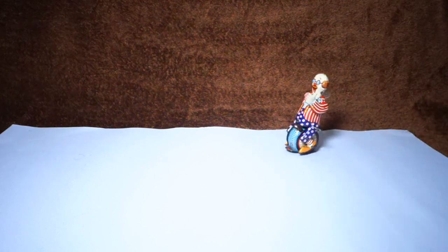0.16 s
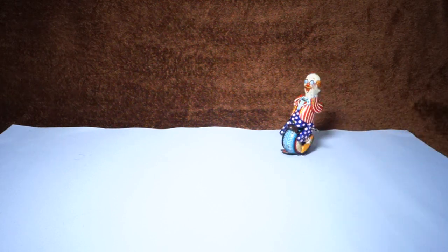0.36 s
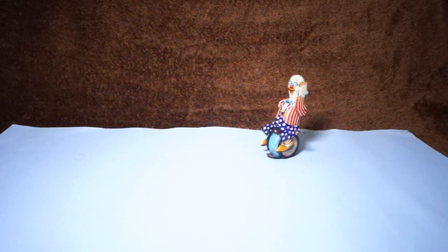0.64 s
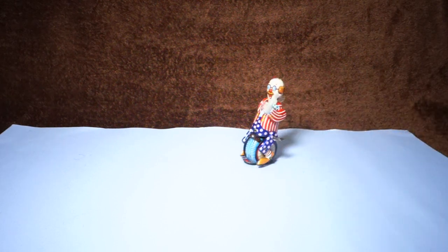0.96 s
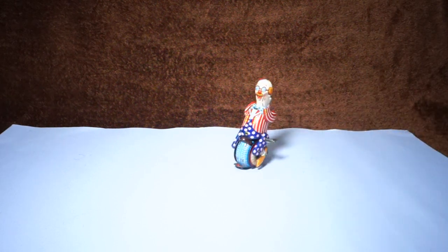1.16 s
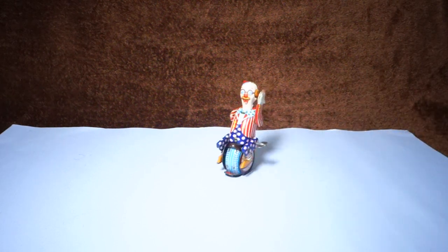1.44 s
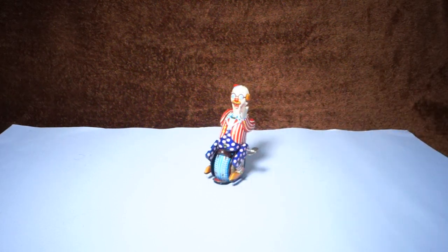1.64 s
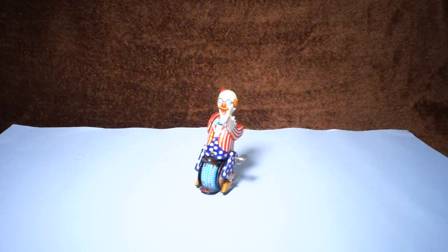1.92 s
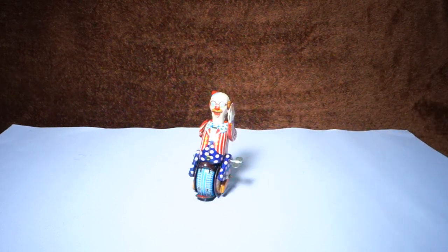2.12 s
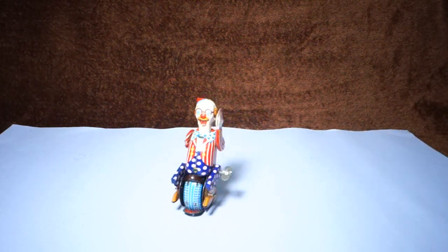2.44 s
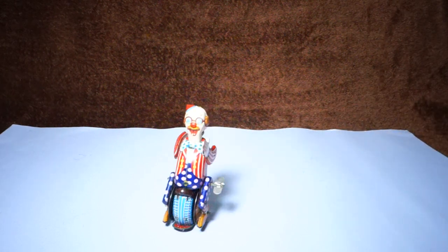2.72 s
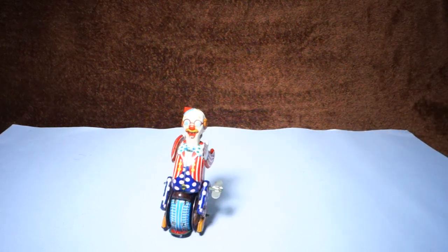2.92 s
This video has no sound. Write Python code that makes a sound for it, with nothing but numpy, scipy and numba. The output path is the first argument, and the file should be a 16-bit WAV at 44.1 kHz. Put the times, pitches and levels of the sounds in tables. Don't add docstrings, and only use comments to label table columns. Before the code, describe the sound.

Clockwork toy gears rattle through thin, bright tin: halting clicks, a fast buzzing ratchet, a dragging slowdown, two more fast runs and a stuttering end, with short room echo, faint hum and soft hiss.

```python
import sys
import numpy as np
from scipy import signal
from scipy.fft import rfft, irfft, next_fast_len
from scipy.io import wavfile
from scipy.ndimage import uniform_filter1d
from numba import njit

SR = 44100
rng = np.random.default_rng(int(sys.argv[2]) if len(sys.argv) > 2 else 0)


def to_wav(s):
    ch = np.atleast_2d(s).T
    pcm = np.round(np.clip(ch, -1, 1) * 32767)
    wavfile.write(sys.argv[1], SR, pcm.astype(np.int16))


def boost_factor(decibels):
    exponent = np.asarray(decibels, float) / 20
    return 10 ** exponent


N = 135828

# frequency in Hz, level in dB.
HUM = [(96, -64), (102, -65)]
# frequency in Hz, level in dB per Hz.
ROOM_TONE = [(25, -22), (60, -1.5), (200, -0.5), (400, -7), (1000, -13), (2000, -8.5), (9000, -18),
             (16000, -23)]
ROOM_DB = -54.5

ECHO_DB, ECHO_T60_S, ECHO_LIKENESS = -7.5, 0.074, 0.81

# start in seconds, peak in
# dB.
STALL_TEETH = [(0.0004, -29.5), (0.0071, -29.5), (0.0152, -38), (0.0297, -37), (0.0603, -47), (0.0773, -34.5),
               (0.0978, -34), (0.1197, -63), (0.1266, -29.0), (0.1504, -32), (0.1678, -29.5), (0.1829, -30),
               (0.2015, -33), (0.2152, -58), (0.2295, -32.5), (0.2416, -57), (0.2546, -29.5), (0.2655, -23),
               (0.2786, -30.5), (0.2897, -23.5),
               (1.709, -24), (1.721, -27.5), (1.7382, -27), (1.7513, -25), (1.7663, -26), (1.779, -27.5),
           (1.7963, -29), (1.8113, -44), (1.8253, -33.4), (1.831, -37), (1.8499, -30), (1.8638, -23.5),
           (1.8835, -27), (1.8954, -24.5), (1.911, -28), (1.9247, -26), (1.954, -32), (1.98, -28.5),
           (1.993, -27), (2.0112, -25.5), (2.0258, -25.5), (2.0364, -24.5), (2.0452, -23),
               (2.7245, -26.5), (2.7376, -49), (2.7465, -35), (2.7823, -56), (2.7941, -41.8), (2.8014, -43),
           (2.8307, -32), (2.8536, -29), (2.864, -40), (2.8772, -29.5), (2.8877, -25.5), (2.9018, -29),
           (2.9167, -27), (2.9321, -46), (2.9459, -42), (2.9587, -52), (2.971, -38), (2.9923, -29),
           (3.005, -23), (3.0224, -28), (3.0357, -24.5), (3.0496, -23.5), (3.058, -23.4), (3.0703, -23)]
# start in seconds, peak in dB.
DRAG_TEETH = [(0.7278, -31), (0.7406, -25.5), (0.7579, -26.7), (0.77, -22), (0.7814, -28), (0.7929, -24),
              (0.8063, -25), (0.8194, -25), (0.8318, -25.5), (0.8441, -28.5), (0.8577, -21.5), (0.8697, -26.5),
              (0.8861, -24), (0.8989, -28), (0.9164, -24), (0.928, -25), (0.9436, -26), (0.9622, -28.5),
              (0.9824, -25), (0.9951, -29.5), (1.0067, -34), (1.013, -31), (1.0277, -25), (1.0402, -30),
              (1.0526, -27.5), (1.0708, -27), (1.0849, -25),
              (1.5473, -27.5), (1.5678, -24.5), (1.5823, -24), (1.5987, -25), (1.6127, -24), (1.6271, -24.5),
          (1.6397, -22.5), (1.6551, -28), (1.667, -22), (1.6815, -23.5), (1.694, -24),
              (2.482, -25.1), (2.5006, -25.5), (2.514, -23), (2.5326, -25.5), (2.542, -24.2), (2.557, -25.5),
          (2.571, -23), (2.5874, -24.5), (2.6004, -23.5), (2.615, -26), (2.629, -24.5), (2.6443, -27.2),
          (2.659, -25), (2.6784, -25), (2.6904, -24), (2.7118, -23)]
# start in seconds, peak in dB.
RUN_TEETH = [(0.3003, -21.5), (0.3074, -22.6), (0.319, -24.5), (0.3277, -22.5), (0.3382, -26), (0.3481, -25),
             (0.359, -22.5), (0.3702, -27), (0.3793, -23), (0.3865, -27), (0.3991, -25), (0.4063, -22),
             (0.4194, -22.5), (0.4291, -25), (0.439, -23.5), (0.4473, -21), (0.4574, -24), (0.4638, -24),
             (0.4777, -29), (0.4852, -26), (0.4969, -28), (0.5054, -30), (0.5181, -24), (0.5277, -25.5),
             (0.5386, -28), (0.5477, -23.5), (0.5584, -24.4), (0.57, -25.5), (0.5807, -27), (0.5905, -23),
             (0.6014, -28), (0.6107, -27), (0.6209, -20), (0.6298, -30), (0.6416, -24.2), (0.6524, -23.5),
             (0.6624, -23.5), (0.6731, -25), (0.6835, -25), (0.6968, -25.9), (0.7102, -25.9),
             (1.0963, -24.5), (1.1081, -22.5), (1.118, -22), (1.128, -23), (1.1363, -24.5), (1.1469, -24.5),
         (1.1556, -23.5), (1.1686, -23.5), (1.178, -22), (1.19, -23), (1.1966, -25), (1.2074, -21),
         (1.2163, -27), (1.227, -25), (1.2352, -22), (1.2486, -24.5), (1.26, -27), (1.2693, -22.5),
         (1.2785, -22.5), (1.2883, -22.5), (1.2986, -33), (1.308, -24), (1.317, -28), (1.3299, -22),
         (1.343, -31), (1.353, -25), (1.364, -26), (1.376, -21), (1.3876, -29.5), (1.3977, -23.5),
         (1.409, -26), (1.419, -22.5), (1.4303, -23), (1.4405, -20.5), (1.4483, -26.5), (1.4586, -23.4),
         (1.4682, -21), (1.481, -18.5), (1.491, -29), (1.5007, -25), (1.5096, -21.5), (1.5224, -24),
         (1.534, -25.5),
             (2.057, -20.5), (2.0679, -20), (2.0831, -26), (2.094, -24.5), (2.1037, -22), (2.1137, -21),
         (2.1238, -22), (2.1316, -20.5), (2.145, -26.5), (2.1539, -21), (2.166, -25.5), (2.176, -20.5),
         (2.188, -22), (2.1964, -25), (2.21, -21), (2.2186, -23.9), (2.2324, -23), (2.2466, -25),
         (2.257, -21), (2.2666, -22), (2.279, -28), (2.2883, -24), (2.3023, -21.5), (2.3146, -36.5),
         (2.325, -21.5), (2.3377, -25), (2.349, -22), (2.3603, -23.5), (2.372, -24), (2.3808, -22),
         (2.3928, -21.3), (2.4037, -31), (2.411, -20.5), (2.424, -21), (2.434, -29), (2.445, -24),
         (2.4577, -22.5), (2.4702, -25.5)]
STALL_DB, DRAG_DB, RUN_DB = 2, -1.2, -0.84

# start in seconds, end in seconds.
RUNS_S = [
    (.285, .72),
    (1.092, 1.542),
    (2.03, 2.477),
]
# time in seconds, load in dB.
WHEEL_LOAD = [
    (.3, 0),
    (.52, 6.5),
    (.72, -1),
    (1.09, 4.5),
    (1.3, 7),
    (1.54, -1.5),
    (2.05, 3.5),
    (2.25, 4.5),
    (2.48, 5.5),
]
STALL_LOAD_DB = 0

CLICK_SPREAD_DB, COLOUR_SCATTER_DB = 2, 2
TURN_DB, TURN_S = 0.54, 0.196
RISE_S, FALL_S, RATTLE_S = 0.001, 0.00083, 0.024
STRIKE_GAIN = 5.14
RATTLE_DB, RUN_RATTLE_DB, WHIR_DB = -12, 2.5, -47
NEARER_DB_PER_S = 0.5

ZONES_HZ = [850, 1350, 1800, 2800, 4200, 5600, 8200, 10300, 12500, 14500]
# frequency in Hz, level in dB per Hz.
TIN = [(300, -35.5), (600, -27), (1050, -22), (1600, -12.5), (2300, -6.5), (2800, -4.5), (7750, -3.5),
       (16000, -1)]
# centre in Hz, width in Hz, level over the tin in dB.
SHELL = [(668, 40, 1), (802, 46, -0.5), (1270, 51, 2), (2570, 37, -24), (9580, 240, -9.5),
         (10600, 590, -7.5), (14100, 370, -11)]
# time in seconds, centre in Hz, level in dB.
CAVITY = [
    (0, 2050, 1),
    (.35, 1770, 1.5),
    (.8, 1985, 7),
    (1.2, 1940, 8),
    (1.55, 1755, 12),
    (1.8, 1770, 7.5),
    (2.1, 1700, 6),
    (2.6, 1780, 2.5),
    (3.08, 1850, 1),
]
CAVITY_WIDTH_HZ = 113
# frequency in Hz, left-right likeness from 0 to 1.
LIKENESS = [(500, 0.97), (1500, 0.87), (3500, 0.52), (7000, 0.33), (15000, 0.26)]
LEFT_LAG_S = -0.000013
PAN_START_DB, PAN_END_DB, PAN_FULL_HZ = -9, -6.5, 1700

# centre in Hz, width in Hz, level in dB.
POSE_1 = [(2520, 130, 2.5), (2900, 170, 0), (3630, 220, -7), (4260, 190, 8.5), (5500, 260, 3)]
POSE_2 = [(2840, 80, -0.06), (3960, 330, 0.81), (5450, 230, -1.8), (7080, 55, -2), (8300, 97, -1)]
POSE_3 = [(2640, 43, -1), (3920, 230, 2.5), (5550, 320, 0), (6600, 190, -2), (8230, 140, 0)]
POSE_4 = [(2600, 41, -2.6), (2975, 67, -2.8), (4280, 55, -1), (5580, 180, -1.4), (7020, 73, -1.5)]
POSE_5 = [(818, 77, -0.5), (2820, 250, -7), (5270, 65, -1), (5690, 110, 2), (6880, 77, 1), (7130, 120, -2)]
POSE_6 = [(2850, 130, 1), (4170, 160, 4.7), (5630, 230, 3.5), (6930, 280, 1.5), (8270, 170, 4.8)]
POSE_EDGES_S = [0, .28, .72, 1.09, 2.0, 2.76, 3.2]
POSE_DB = -1
NOTCH_HZ, NOTCH_WIDTH_HZ, NOTCH_S = 2250, 210, (0.81, 1.21)

TOP_HZ = 15750


def table(rows, x, col=1):
    rows = np.array(rows, float)
    return np.interp(x, rows[:, 0], rows[:, col])


def colour(rows, hz):
    return table([(np.log(f), v) for f, v in rows], np.log(hz))


def unit(x):
    return x / np.sqrt(np.mean(x ** 2))


def decay(x, s):
    return signal.lfilter([1], [1, -np.exp(-1 / (s * SR))], x, axis=-1)


def ringing(panels, hz, more_db=0):
    return sum(boost_factor(db + more_db) * 1j * hz * width / (centre ** 2 - hz ** 2 + 1j * hz * width)
               for centre, width, db in panels)


@njit
def svf(x, hz, width):
    y, b, l = np.empty(len(x)), 0., 0.
    for i in range(len(x)):
        g, k = np.tan(np.pi * hz[i] / SR), width / hz[i]
        v = (b + g * (x[i] - l)) / (1 + g * (g + k))
        b, l, y[i] = 2 * v - b, l + 2 * g * v, k * v
    return y


def room(t):
    hz = np.maximum(np.fft.rfftfreq(N, 1 / SR), 10)
    tone = boost_factor(colour(ROOM_TONE, hz))
    width = np.clip(hz / 620.0, .2, 1)
    mid = irfft(rfft(rng.standard_normal(N)) * tone, N)
    side = irfft(rfft(rng.standard_normal(N)) * tone * width, N)
    hiss = unit(mid + side * np.array([[1], [-1]])) * boost_factor(ROOM_DB)
    hum = sum(np.sqrt(2) * boost_factor(db) * np.sin(2 * np.pi * f * t) for f, db in HUM)
    return hiss + hum


def echo(x):
    lag = np.arange(5000) / SR
    fall = boost_factor(-60 * lag / ECHO_T60_S) * (lag > .002)
    place = np.linspace(0, 7, N)
    out = 0
    for k in range(8):
        both = rng.standard_normal(len(lag))
        own = rng.standard_normal((2, len(lag)))
        tail = (np.sqrt(ECHO_LIKENESS) * both + np.sqrt(1 - ECHO_LIKENESS) * own) * fall
        tail = tail / np.sqrt(np.sum(tail ** 2, axis=1, keepdims=True))
        here = np.sqrt(np.clip(1 - np.abs(place - k), 0, 1))
        out = out + signal.fftconvolve(x * here, tail, axes=1)[:, :N]
    return boost_factor(ECHO_DB) * out


def table_reflection(x, t):
    held = uniform_filter1d(1. * ((t > NOTCH_S[0]) & (t < NOTCH_S[1])), size=2000)
    centre = np.full(N, 1. * NOTCH_HZ)
    return x - held * np.array([svf(v, centre, 1. * NOTCH_WIDTH_HZ) for v in x])


def facing(x, t):
    size = next_fast_len(N)
    hz, out = np.fft.rfftfreq(size, 1 / SR), x
    poses = (POSE_1, POSE_2, POSE_3, POSE_4, POSE_5, POSE_6)
    for start, end, panels in zip(POSE_EDGES_S, POSE_EDGES_S[1:], poses):
        held = uniform_filter1d(1. * ((t >= start) & (t < end)), size=2000)
        out = out + irfft(rfft(x * held, size) * ringing(panels, hz, POSE_DB), size)[:, :N]
    return out


def cavity(x, t):
    centre = table(CAVITY, t)
    ring = np.array([svf(v, centre, 1. * CAVITY_WIDTH_HZ) for v in x])
    return boost_factor(table(CAVITY, t, col=2)) * ring


def tin_shell(push):
    size = next_fast_len(N)
    hz = np.maximum(np.fft.rfftfreq(size, 1 / SR), 10)
    zones = np.array([colour(list(zip(ZONES_HZ, row)), hz) for row in np.eye(len(ZONES_HZ))])
    shared, left, right = (np.sum(zones * rfft(push * clicks(), size), axis=0) for _ in range(3))
    body = boost_factor(colour(TIN, hz)) * (1 + ringing(SHELL, hz))
    like = np.clip(colour(LIKENESS, hz), 0, 1)
    ports = body * (np.sqrt(like) * shared + np.sqrt(1 - like) * np.array([left, right]))
    ports[0] *= np.exp(-2j * np.pi * hz * LEFT_LAG_S)
    reach = np.clip(hz / PAN_FULL_HZ, 0, 1)
    return irfft(ports * boost_factor(np.array([[.5], [-.5]]) * PAN_START_DB * reach), size)[:, :N]


def clicks():
    sizes = boost_factor(CLICK_SPREAD_DB * rng.exponential(size=N))
    hits = np.clip(unit(rng.standard_normal(N) * sizes), -4.5, 4.5)
    return unit(hits / np.sqrt(uniform_filter1d(hits ** 2, size=90)))


def teeth():
    groups = [(STALL_TEETH, STALL_DB),
              (DRAG_TEETH, STALL_DB + DRAG_DB),
              (RUN_TEETH, RUN_DB)]
    return np.array([(s, db + more) for rows, more in groups for s, db in rows]).T


def gear_push(t):
    at, db = teeth()
    count = len(ZONES_HZ)
    tint = rng.standard_normal((len(at), count))
    tint = tint - tint.mean(axis=1, keepdims=True)
    strikes = np.zeros((count, N))
    strikes[:, np.clip((at * SR).astype(int), 0, N - 1)] = boost_factor(db + COLOUR_SCATTER_DB * tint.T)
    drift = rng.standard_normal((count, 40))
    strikes *= boost_factor(TURN_DB * np.array([np.interp(t / TURN_S, np.arange(40), row) for row in drift]))
    onset = decay(decay(decay(strikes, RISE_S), RISE_S), RISE_S) / (RISE_S * SR) ** 3
    running = sum((t > a) & (t < b) for a, b in RUNS_S) > 0
    loose = boost_factor(RATTLE_DB + RUN_RATTLE_DB * running)
    push = STRIKE_GAIN * decay(onset, FALL_S) + decay(onset * loose, RATTLE_S) + boost_factor(WHIR_DB)
    push[0] *= boost_factor(NEARER_DB_PER_S * t)
    load_db = np.where(running, table(WHEEL_LOAD, t), STALL_LOAD_DB)
    push[:2] *= boost_factor(uniform_filter1d(load_db, size=600))
    return push


def toy(t):
    out = tin_shell(gear_push(t))
    out = table_reflection(facing(out, t), t)
    out = out * boost_factor(np.array([[.5], [-.5]]) * (PAN_END_DB - PAN_START_DB) * t / t[-1])
    return out + cavity(out, t)


def scene():
    t = np.arange(N) / SR
    tin = toy(t)
    return tin + echo(tin) + room(t)


def band_limit(x):
    return signal.sosfilt(signal.butter(12, 15820, fs=SR, output="sos"), x)


def record(dry):
    top_cut = signal.ellip(10, .2, 70, TOP_HZ, fs=SR, output="sos")
    mix = signal.sosfilt(top_cut, dry)
    return band_limit(mix)


dry = scene()
out = record(dry)
to_wav(out)
```